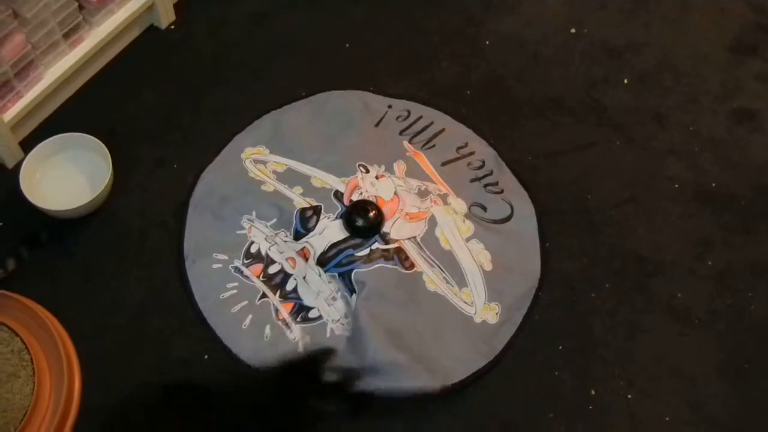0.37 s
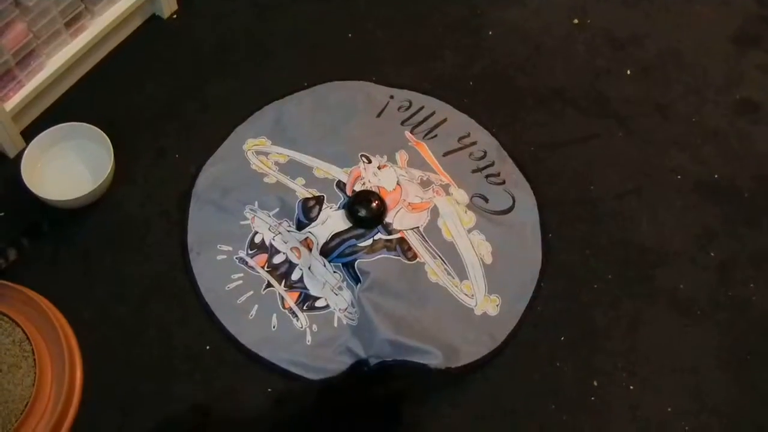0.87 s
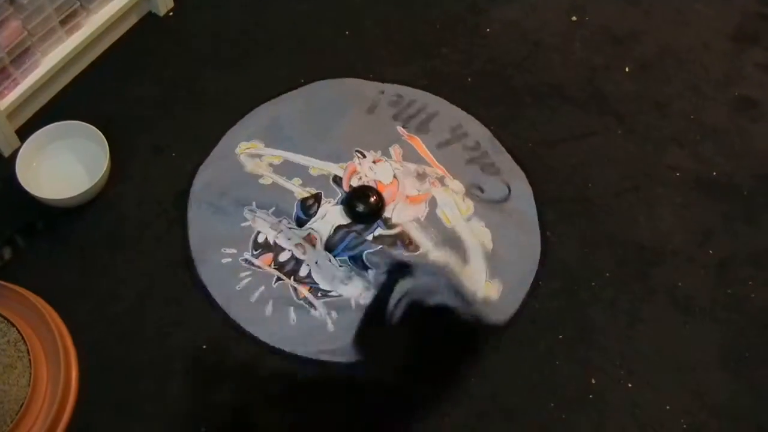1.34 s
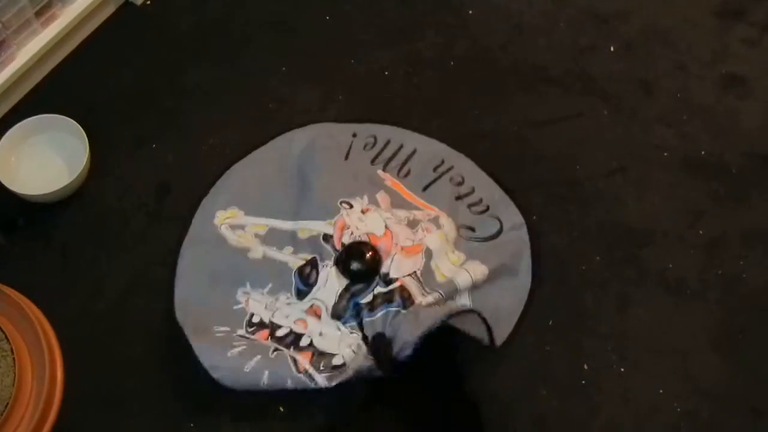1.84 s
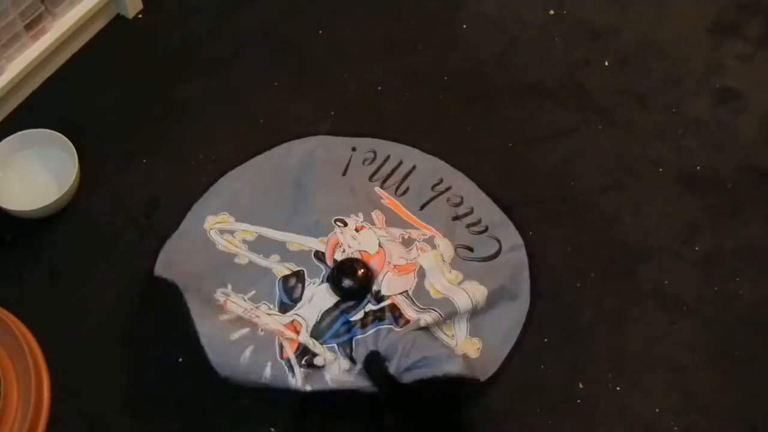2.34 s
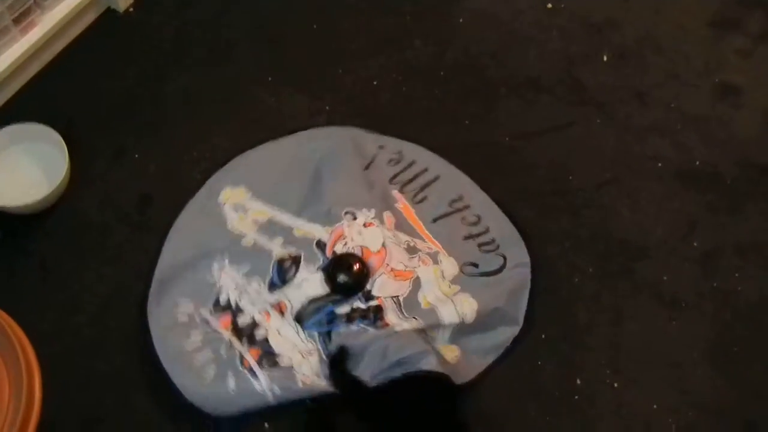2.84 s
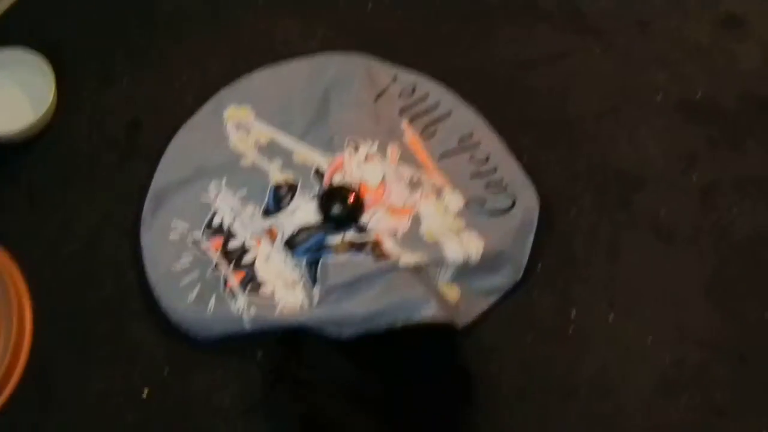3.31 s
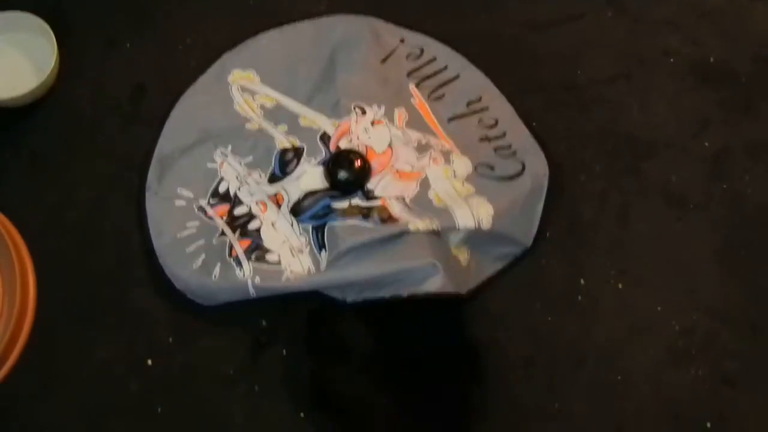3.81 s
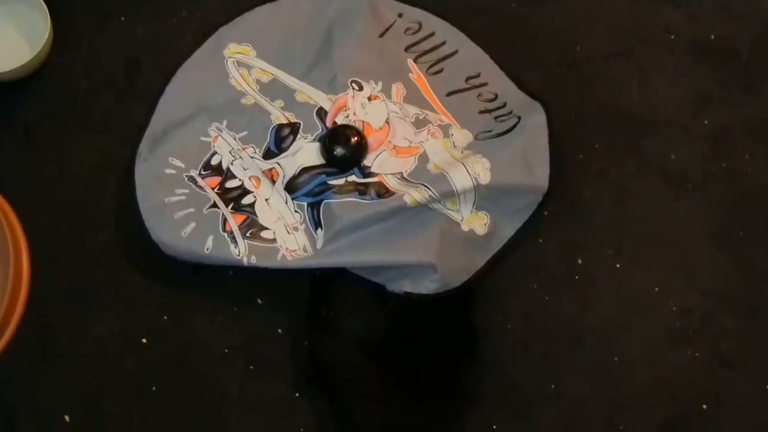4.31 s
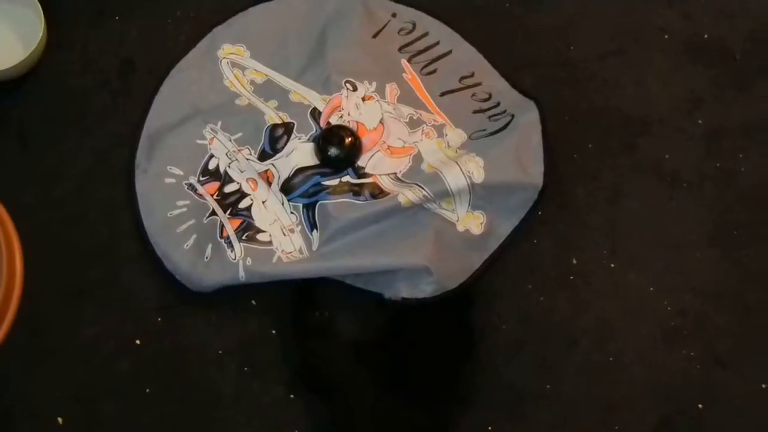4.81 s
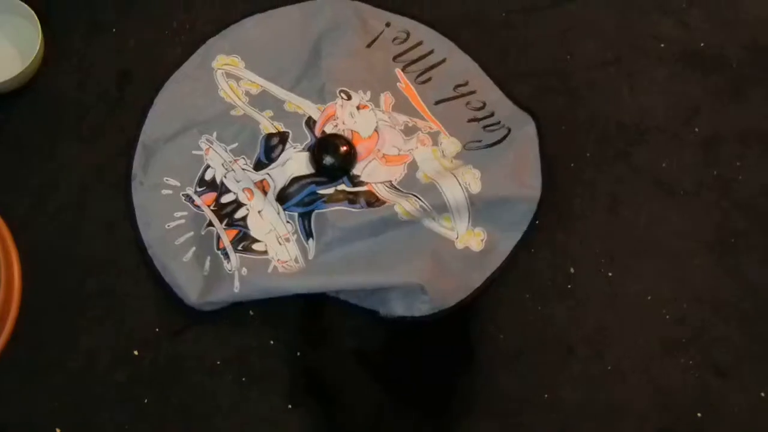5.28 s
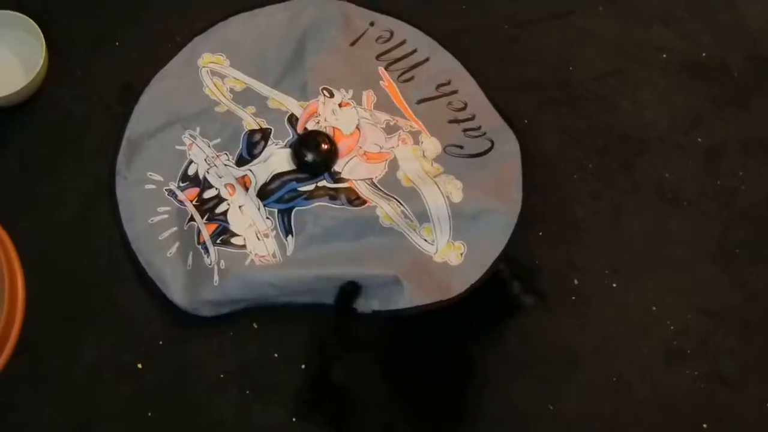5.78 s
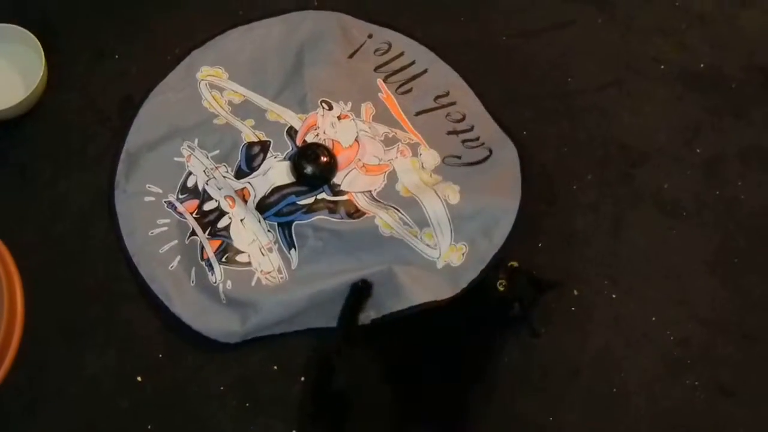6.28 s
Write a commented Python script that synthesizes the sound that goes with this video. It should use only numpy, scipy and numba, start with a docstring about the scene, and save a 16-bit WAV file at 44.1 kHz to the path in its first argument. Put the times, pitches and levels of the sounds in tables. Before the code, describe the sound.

A cat swipes at a toy hidden under a round nylon cover on a hard floor. Two isolated scratchy knocks come first, then a loud flurry of scraping, plastic clatter and cloth rustle. The pawing continues in shorter hits, with one more strong crack halfway, then dwindles to faint drags and taps. A small furnished room, heard close on a hand-held phone with soft hum and hiss.

```python
"""Cat at a covered wand toy

A cat paws and pounces at a wand toy under a round nylon cover on a hard floor, heard through a hand-held phone.
Each swipe is a burst of tiny contacts that knocks the plastic housing and snaps the cloth; hard ticks ring the
plastic. Between swipes the cloth drags and crinkles; the floor thuds and bumps softly.
A small furnished room answers briefly over its own quiet hum and microphone hiss."""
import sys
import numpy as np
from scipy import signal
from scipy.fft import rfft, irfft
from scipy.io import wavfile
from scipy.ndimage import uniform_filter1d
from numba import njit

SR = 44100
rng = np.random.default_rng(int(sys.argv[2]) if len(sys.argv) > 2 else 0)


def pcm_store(signal):
    """Save signal as 16-bit PCM."""
    levels = np.round(np.clip(np.atleast_2d(signal), -1, 1) * 32767)
    wavfile.write(sys.argv[1], SR, levels.astype(np.int16).T)


def gain_from_db(level_db):
    """Turn a decibel level (scalar or array-like) into a linear amplitude factor."""
    decades = np.asarray(level_db, float) / 20
    return 10 ** decades


N = 292824
LEFT_RIGHT = np.array([[1], [-1]])


def unit(x):
    """Scale to rms 1."""
    return x / np.sqrt(np.mean(x ** 2) + 1e-18)


@njit
def svf(x, hz, sharp):
    """State-variable band-pass with a moving centre, gain 1 there."""
    y, band_state, low_state = np.empty(len(x)), 0., 0.
    damping = 1 / sharp
    for i in range(len(x)):
        g = np.tan(np.pi * hz[i] / SR)
        v = (band_state + g * (x[i] - low_state)) / (1 + g * (g + damping))
        band_state = 2 * v - band_state
        low_state += 2 * g * v
        y[i] = damping * v
    return y


def band(scrape, hz, sharp):
    """Contacts heard through a broad band at the pitch they scrape at, level kept."""
    narrowed = svf(svf(scrape, hz, sharp), hz, sharp)
    return narrowed * np.sqrt(SR * sharp / hz)


def ring(x, modes):
    """Sum of resonances of alternating sign."""
    out = np.zeros(len(x))
    for k, (hz, width_hz, db) in enumerate(modes):
        mode = svf(x, np.full(len(x), 1. * hz), hz / max(width_hz, 5.))
        out += (-1) ** k * gain_from_db(db) * mode
    return out


def colour(x, points):
    """Shape the spectrum by (f/Hz, level/dB) points, interpolated over log f."""
    hz, db = np.transpose(points)
    log_f = np.log(np.arange(len(x) // 2 + 1) * SR / len(x) + 1)
    return irfft(rfft(x) * gain_from_db(np.interp(log_f, np.log(hz), db)), len(x))


def walk(rate_hz):
    """Random levels held 1 / rate s and slewed; rms 1."""
    k = int(SR / rate_hz)
    held = np.repeat(rng.standard_normal(N // k + 1), k)
    slewed = uniform_filter1d(uniform_filter1d(held, k), k)
    return unit(slewed[:N])


def grit(scatter_db, clump_db):
    """Dense micro-contacts, a few far stronger than the rest, arriving in clumps; rms 1."""
    level_db = scatter_db * rng.exponential(size=N) + clump_db * walk(150.)
    return unit(rng.standard_normal(N) * gain_from_db(level_db))


def spread(push, points):
    """A broad source: coloured grit, one part common to both ears and one part opposed."""
    return (colour(push * grit(2.8, 1.2), points) for _ in range(2))


# hum and hiss spectrum: f/Hz, level/dB per Hz
HUM_SPECTRUM = [(12, -45), (20, -12.5), (107, -1.5), (270, -9), (410, -0.5), (590, -1), (802, -2),
                (949, -5), (2020, -6), (2990, -8.5), (4670, -17.5), (8650, -20.5), (14300, -20.5),
                (16000, -21.5)]
# share of hum common to both ears: f/Hz, share/0-1
HUM_ALIKE = [(40, 0.36), (300, 0.34), (1000, 0.5), (4000, 0.05), (12000, 0)]


def hum():
    """Room tone and microphone hiss: shaped noise, partly alike in both ears, wavering a little."""
    level_db, waver_db = -47.5, 0.24
    share = [(hz, np.clip(c, .01, .99)) for hz, c in HUM_ALIKE]
    mid = colour(rng.standard_normal(N), [(hz, 10 * np.log10(1 + c)) for hz, c in share])
    side = colour(rng.standard_normal(N), [(hz, 10 * np.log10(1 - c)) for hz, c in share])
    ears = np.array([colour(mid + side, HUM_SPECTRUM), colour(mid - side, HUM_SPECTRUM)])
    return gain_from_db(level_db + waver_db * walk(2.6)) * unit(ears)


def room(x):
    """Direct sound and a dense short decaying tail, mostly alike in both ears."""
    t60_s, build_s, mid_db, side_db = 0.21, 0.0072, -3.5, -16
    t = np.arange(SR // 2) / SR
    fade = np.exp(-np.log(1000) * t / t60_s) * np.minimum(t / build_s, 1)
    mid, side = rng.standard_normal((2, len(t))) * fade / np.sqrt(np.sum(fade ** 2))
    wet_mid, wet_side = (signal.fftconvolve(x, tail)[:N] for tail in (mid, side))
    return x + gain_from_db(mid_db) * wet_mid + gain_from_db(side_db) * wet_side * LEFT_RIGHT


# soft low bumps, perhaps the cat's weight landing on the floor: t/s, level/dB
BUMP_EVENTS = [(0.445, -45), (0.731, -48), (1.019, -52), (2.209, -45), (2.419, -45), (2.612, -38),
               (2.729, -40), (2.862, -50), (3.059, -45), (3.222, -40), (3.349, -46), (3.699, -48),
               (3.733, -42), (4.099, -51), (4.456, -49), (4.548, -43), (4.619, -41), (6.002, -50),
               (6.308, -52), (6.459, -45)]


def bumps():
    """Each bump is one smooth swell of about one low cycle, its pitch a little different every time."""
    centre_hz, half_length_s = 85, 0.0062
    out, t = np.zeros(N), np.arange(SR // 5) / SR
    swell = np.exp(-(t / half_length_s - 2) ** 2)
    for (s, level_db), (bend, turn) in zip(BUMP_EVENTS, rng.random((len(BUMP_EVENTS), 2))):
        i = int(s * SR)
        hz = centre_hz * 2 ** (bend - .5)
        bump = gain_from_db(level_db) * swell * np.sin(2 * np.pi * (hz * t + turn))
        out[i:i + len(t)] += bump[:N - i]
    return out


# floor thud spectrum: f/Hz, level/dB per Hz
FLOOR_SPECTRUM = [(20, -40), (60, -24), (110, -5.5), (160, 0.5), (220, -1.5), (270, -9.5), (500, -47)]


def floor(thud):
    """Hard floor answering the thumps and drags: low grit, common and opposed parts."""
    return spread(gain_from_db(16.5) * thud, FLOOR_SPECTRUM)


# cloth rustle spectrum: f/Hz, level/dB per Hz
CLOTH_SPECTRUM = [(120, -32), (400, -9), (2500, -4), (4000, -2), (5000, -3), (7000, -5.5), (9000, -9),
                  (13000, -9.5), (15500, -13), (16200, -40)]


def cloth(rustle):
    """Nylon rustle: bright grit, common and opposed parts."""
    return spread(gain_from_db(2) * rustle, CLOTH_SPECTRUM)


# cloth dragged over the floor: full pull from t/s, held/s, scrape level/dB, centre f/Hz, crinkle level/dB
DRAG_STROKES = [(0.0, 0.071, -50.5, 1380, -59.5), (0.2, 0.097, -51.5, 1260, -67),
                (0.47, 0.022, -35, 1240, -49), (0.759, 0.008, -41, 2100, -44.5),
                (0.92, 0.0077, -49.5, 1250, -61), (1.0, 0.064, -46.5, 1130, -69),
                (1.26, .03, -57, 1310, -50), (1.39, 0.02, -25, 1390, -39), (1.48, 0.068, -28, 1680, -40),
                (1.63, 0.037, -21.5, 1800, -31.5), (1.79, 0.042, -23.5, 1510, -35.5),
                (1.92, .05, -36.5, 1480, -47), (2.059, 0.01, -29.5, 1490, -42),
                (2.15, 0.053, -33, 1250, -42.5), (2.3, .02, -29, 1590, -50),
                (2.38, 0.053, -36.5, 1210, -46.5), (2.51, 0.029, -33, 1210, -54),
                (2.639, 0.0091, -35.5, 1160, -55), (2.76, 0.049, -43, 1200, -53),
                (2.84, .02, -42, 1810, -49.5), (2.9, 0.066, -42, 1600, -48),
                (3.01, 0.051, -37, 1810, -43.5), (3.18, 0.054, -39, 1270, -51),
                (3.35, 0.044, -47, 1440, -56), (3.53, 0.037, -50, 1040, -64), (3.7, 0.13, -46, 1140, -62),
                (3.96, .01, -47, 1380, -53), (4.07, 0.036, -48, 1070, -59), (4.22, 0.046, -45, 1800, -56),
                (4.46, .03, -44.5, 1080, -66), (4.57, 0.07, -51.5, 1130, -77), (4.95, 0.11, -58, 1390, -69),
                (5.15, 0.033, -51.5, 1170, -63), (5.39, .13, -46, 2020, -49),
                (5.75, 0.13, -53.5, 1800, -55.5), (6.01, 0.031, -38, 1330, -43.5),
                (6.17, 0.033, -50.5, 1620, -53.5), (6.31, 0.057, -43, 990, -53),
                (6.48, 0.022, -42.5, 1280, -60), (6.58, 0.069, -39, 2170, -43)]


def strokes():
    """Scrape level/dB of the dragged cloth, the pitch/Hz its strongest strokes scrape at, crinkle level/dB."""
    swell_db_s, die_db_s, rest_crinkle_db = 204, 165, -63
    t = np.arange(0, N + 64, 64) / SR
    s, held_s, scrape_db, hz, crinkle_db = (c[:, None] for c in np.transpose(DRAG_STROKES))
    pull_db = -swell_db_s * np.maximum(s - t, 0) - die_db_s * np.maximum(t - s - held_s, 0)
    power = gain_from_db(2 * (scrape_db + pull_db)) + 1e-18
    scrape = power.sum(axis=0)
    pitch_hz = (power * hz).sum(axis=0) / scrape
    crinkle = gain_from_db(2 * (crinkle_db + pull_db)).sum(axis=0) + gain_from_db(2 * rest_crinkle_db)
    rows = 10 * np.log10(scrape), pitch_hz, 10 * np.log10(crinkle)
    return (np.interp(np.arange(N) / SR, t, row) for row in rows)


# claws and the wand tick against plastic: t/s, level/dB, centre f/Hz, treble level/dB
TICK_EVENTS = [(0.4506, -36, 1210, -52), (0.7505, -11.5, 2020, -34), (0.844, -45, 1780, -51),
               (0.8979, -30, 1050, -51), (1.3988, -7, 1370, -50), (1.49, -5, 3220, -42),
               (1.5234, -2.5, 2010, -34), (1.5661, -4.5, 1340, -37), (1.6236, -4, 1600, -29),
               (1.654, -6, 1600, -28), (1.6887, -6, 2840, -35), (1.7822, -12, 2260, -28),
               (1.9944, -30, 1560, -51), (2.0406, -14, 1570, -40.5), (2.2665, -27, 1040, -18),
               (2.2735, -30, 1050, -21), (2.283, -15, 1180, -31), (2.357, -20, 1160, -39),
               (2.4462, -15.5, 1210, -48), (2.508, -28, 1170, -54), (2.587, -14.5, 1020, -52),
               (2.7384, -30, 1530, -60), (3.0031, -20, 1770, -40), (3.021, -8.5, 1790, -40),
               (3.0305, -15, 1800, -39), (3.0432, -8, 1900, -24), (3.1603, 0, 1250, -15.5),
               (3.1873, -3, 1240, -38), (3.3572, -32, 1500, -45), (3.7115, -33, 1330, -57),
               (3.7523, -42, 1340, -59), (3.899, -28, 1950, -57), (4.4683, -39, 1200, -55),
               (4.4805, -30, 2900, -52), (4.4956, -40, 1040, -57), (4.5705, -33, 1320, -59),
               (4.623, -26, 1230, -61), (5.9958, -13, 1490, -41), (6.2605, -30, 1430, -58),
               (6.4672, -31, 1440, -58)]


def ticks():
    """Single hard taps: each rings a broad band at its pitch and flicks the cloth for a millisecond or two."""
    taps, flick, hz = np.zeros(N), np.zeros(N), np.full(N, 1. * TICK_EVENTS[0][2])
    for s, level_db, centre_hz, treble_db in TICK_EVENTS:
        i = int(s * SR)
        taps[i], flick[i], hz[i:] = gain_from_db(level_db), gain_from_db(treble_db), centre_hz
    taps *= np.sign(rng.standard_normal(N))
    # one more root of the band's narrowness keeps the peak of a lone tap
    ringing = 0.58 * band(taps, hz, sharp=0.54) * np.sqrt(SR / hz)
    flick_decay_s = 0.0017
    return ringing, signal.lfilter([1.4], [1, -np.exp(-1 / (flick_decay_s * SR))], flick)


# paw swipes: t/s, scrape level/dB, centre f/Hz, housing thump level/dB, cloth swish level/dB
SWIPE_EVENTS = [(0.408, -34, 1020, -37, -58), (0.451, -10, 1150, -24, -35), (0.474, -6.5, 1210, -37, -19),
                (0.749, -13, 1900, -37, -44), (0.896, -41, 1050, -49, -55), (0.993, -40, 762, -34, -57),
                (1.335, -30, 1290, -44, -37), (1.361, -12, 1500, -26, -29), (1.375, 3.5, 1300, -14.5, -30),
                (1.4, 1, 1440, -17, -49), (1.418, -2.5, 1340, -34, -47), (1.489, -17, 1360, -36, -22),
                (1.521, -12.5, 1680, -34, -26), (1.567, -10.5, 1350, -13.5, -26),
                (1.607, -7.5, 1550, -29, -25), (1.653, 4, 1510, -11, -30), (1.685, -0.5, 2670, -17, -32),
                (1.779, -8.5, 2300, -26, -20), (1.815, -8.5, 1220, -21.5, -34),
                (1.845, -16, 1400, -23, -37), (1.994, -15, 1550, -15, -35), (2.041, -9.5, 1510, -23.5, -30),
                (2.109, -29, 894, -23, -36), (2.247, -37, 1020, -38, -22), (2.266, -15.5, 1040, -22, -13.5),
                (2.299, -14, 1240, -22.5, -26), (2.342, -15.5, 1000, -20.5, -37),
                (2.447, -10.5, 1180, -19.5, -42), (2.508, -7, 1190, -28, -56), (2.589, -5, 1270, -35, -46),
                (2.738, -20, 1200, -28.5, -64), (3.02, -14, 1840, -33.5, -23),
                (3.042, -16.5, 1760, -39, -28), (3.144, -17, 1520, -12, -23), (3.16, 2.5, 1360, -11, -28),
                (3.18, -13, 1250, -28, -46), (3.357, -16.5, 1320, -34.5, -56), (3.51, -34, 1280, -45, -58),
                (3.686, -37, 860, -46, -55), (3.709, -26.5, 860, -43, -57), (3.752, -18, 1160, -29, -60),
                (3.898, -31, 1630, -36.5, -57), (4.172, -31, 1950, -34.5, -56), (4.41, -28, 1980, -59, -56),
                (4.448, -36, 1010, -49, -52), (4.467, -29, 829, -44, -54), (4.483, -29, 950, -43, -53),
                (4.569, -23.5, 1110, -30.5, -62), (4.624, -23.5, 860, -35, -64),
                (4.642, -24.5, 1410, -45, -63), (4.987, -37, 750, -37.5, -58), (5.144, -36, 740, -55, -59),
                (5.356, -35, 1530, -40, -53), (5.695, -36, 990, -52, -59), (5.977, -25, 799, -35, -43),
                (5.994, -15, 850, -29, -45), (6.259, -34, 1430, -48, -60), (6.329, -29, 859, -31.5, -49),
                (6.464, -22, 1390, -31, -58), (6.484, -21.5, 1200, -30.5, -59)]


def swipes():
    """Pressure of the paw contacts (scrape, thump, swish, thud), each a fast swell and decay, and their pitch/Hz."""
    contact_s, thud_s = 0.0099, 0.027
    crest_db = 6.5  # a burst peaks about this far over its rms
    push, hz = np.zeros((4, N)), np.full(N, 1. * SWIPE_EVENTS[0][2])
    t = np.arange(SR // 4) / SR
    # cloth and floor swell and fade more lazily than the plastic
    decay_s = np.array([[contact_s], [1.14 * contact_s], [1.54 * contact_s], [thud_s]])
    rise_s = decay_s * np.array([[0.14], [0.14], [0.78], [0.78]])
    shape = np.exp(-t / decay_s) * (1 - np.exp(-t / rise_s))
    for s, scrape_db, centre_hz, thump_db, swish_db in SWIPE_EVENTS:
        i = int(s * SR)
        thud_db = -34 + 0.29 * thump_db
        parts_db = np.array([[scrape_db - crest_db], [thump_db], [swish_db], [thud_db]])
        push[:, i:i + len(t)] += gain_from_db(parts_db) * shape[:, :N - i]
        hz[i:] = centre_hz
    return push, hz


# cover plate resonances: f/Hz, width/Hz, level/dB
PLATE_MODES = [(1044, 29, -9), (1165, 32, -8.5), (1390, 18, -0.5), (1630, 59, 1), (1880, 35, -9),
               (2080, 32, -26)]


def plate(rubbed, tapped, dragged):
    """Cover plate ringing under rubs, taps and drags."""
    return ring(gain_from_db(2) * rubbed + gain_from_db(-5) * tapped + gain_from_db(-2) * dragged, PLATE_MODES)


# plastic housing resonances: f/Hz, width/Hz, level/dB
HOUSING_MODES = [(379, 63, -2), (454.5, 52, 1.5), (530, 67, 1.5), (605, 63, -0.5), (708, 75, -2)]


def housing(knock, tapped):
    """Hollow housing excited by gritty knocks and by taps."""
    return gain_from_db(17.5) * ring(knock * grit(0.67, 0.63) + gain_from_db(-26) * tapped, HOUSING_MODES)


# plastic heard through the cover: f/Hz, level/dB
COVER_MUFFLE = [(40, -50), (200, -28), (290, -6), (350, -0.5), (2600, -3.5), (3500, -4), (4300, -12),
                (7000, -18)]
# what of a tick gets past the cover: f/Hz, level/dB
TICK_ESCAPE = [(40, -55), (400, -27), (2000, -14), (16000, -22)]


def cover(plastic, tapped):
    """Cover filtering the plastic; a little of each tick escapes along another path."""
    return colour(plastic, COVER_MUFFLE) + colour(tapped, TICK_ESCAPE)


def toy():
    """Swipes, ticks and drags: what the plastic sounds, what drives the cloth, how hard the floor thuds."""
    (scrape, thump, swish, thud), swipe_hz = swipes()
    rubbed = band(scrape * grit(2.3, 1.63), swipe_hz, sharp=1.29)
    tapped, flick = ticks()
    scrape_db, drag_hz, crinkle_db = strokes()
    tug_db = 0.95 * walk(25.045)  # the cloth catches and lets go
    # creases in the nylon pop now and then, brighter than the scrape
    pops_per_s = 70
    pops = (rng.random(N) < pops_per_s / SR) * rng.laplace(size=N)
    dragged = band(gain_from_db(scrape_db + tug_db) * grit(2.5, 2.2), drag_hz, sharp=0.92)
    dragged += band(gain_from_db(scrape_db + 16.0) * pops, 1.51 * drag_hz, sharp=0.8)
    # housing rumble is weaker for brighter strokes, -6.5 dB/octave
    rumble_db = scrape_db - 3.5 - 6.5 * np.log2(drag_hz / 1300)
    knock = thump + gain_from_db(rumble_db + tug_db)
    plastic = rubbed + tapped + dragged + plate(rubbed, tapped, dragged) + housing(knock, tapped)
    crinkle = gain_from_db(crinkle_db + tug_db) * (1 + 27.0 * np.abs(uniform_filter1d(pops, size=20)))
    drag_thud = gain_from_db(scrape_db - 15.5)
    return cover(plastic, tapped), swish + flick + crinkle, thud + drag_thud


def scene():
    """Toy in the room, a little to the left, over the hum."""
    hard, rustle, thud = toy()
    cloth_mid, cloth_side = cloth(rustle)
    floor_mid, floor_side = floor(thud)
    side = gain_from_db(-4.5) * cloth_side + gain_from_db(-10.0) * floor_side
    near = room(hard + cloth_mid) + floor_mid + bumps() + side * LEFT_RIGHT
    left_over_right_db = 1
    return near * gain_from_db(left_over_right_db * LEFT_RIGHT / 2) + hum()


def band_limit(x):
    """A steep low-pass at the top of the band."""
    return signal.sosfilt(signal.butter(12, 16500, fs=SR, output="sos"), x)


def record(dry):
    """The phone cuts the deepest bass and rounds the loudest peaks."""
    high_pass = signal.butter(2, 45., "high", fs=SR, output="sos")
    heard = signal.sosfilt(high_pass, dry)
    return band_limit(np.tanh(1.052 * heard) / 1.139)


dry = scene()
out = record(dry)
pcm_store(out)
```